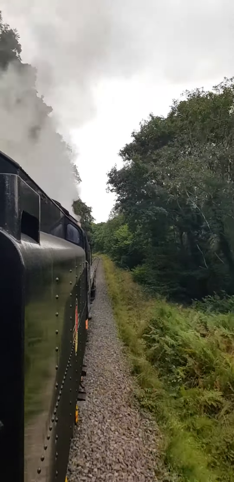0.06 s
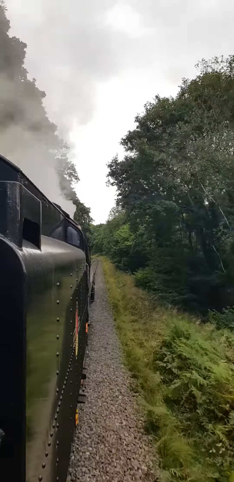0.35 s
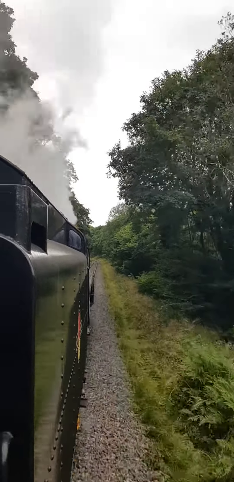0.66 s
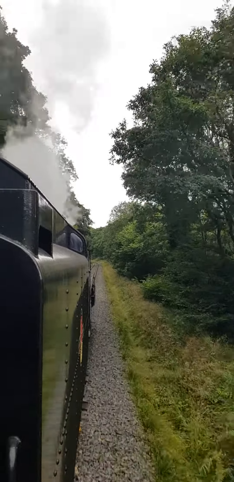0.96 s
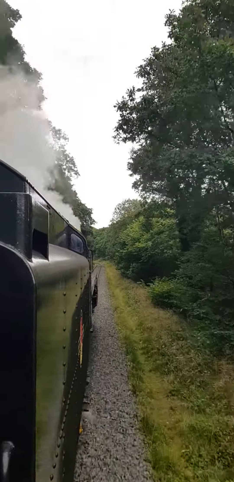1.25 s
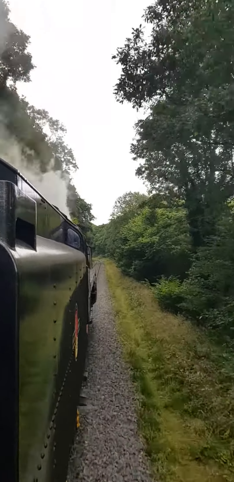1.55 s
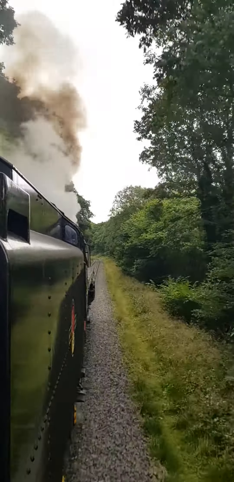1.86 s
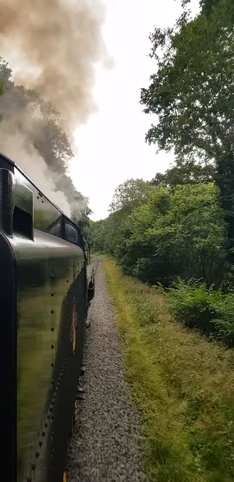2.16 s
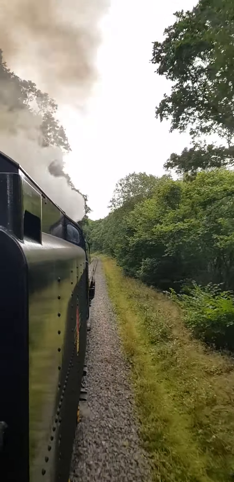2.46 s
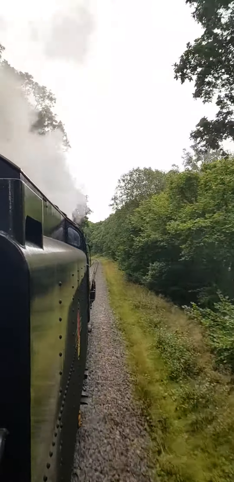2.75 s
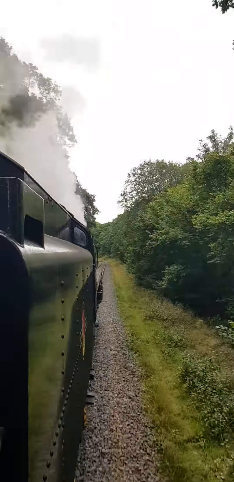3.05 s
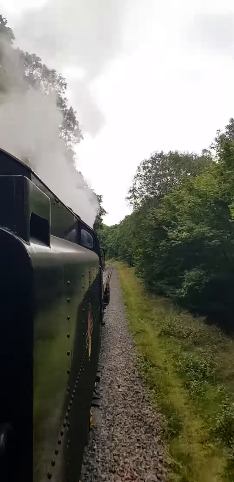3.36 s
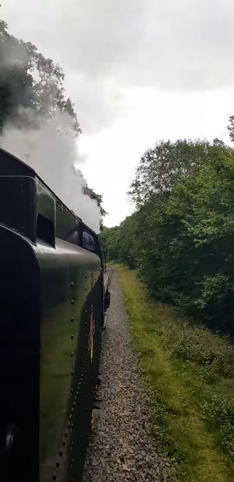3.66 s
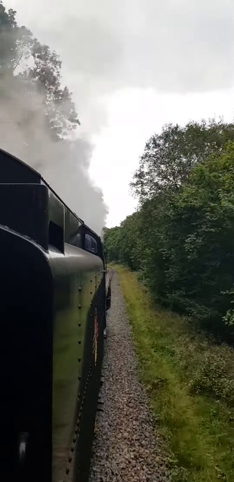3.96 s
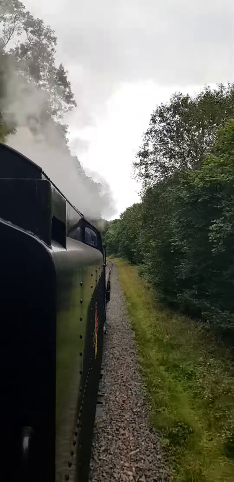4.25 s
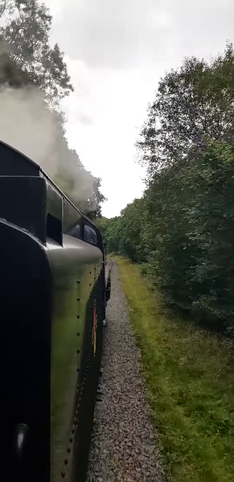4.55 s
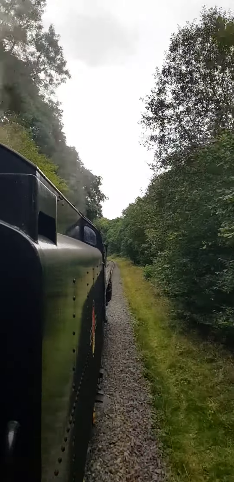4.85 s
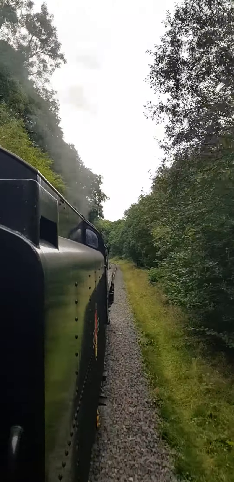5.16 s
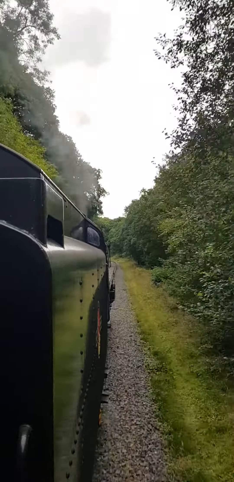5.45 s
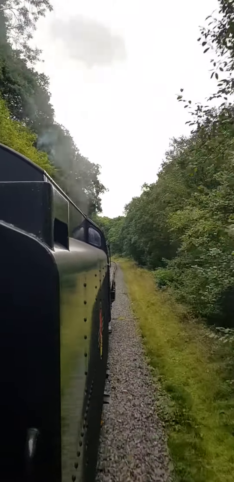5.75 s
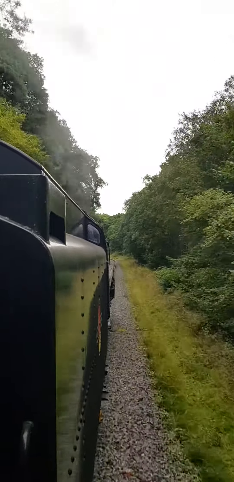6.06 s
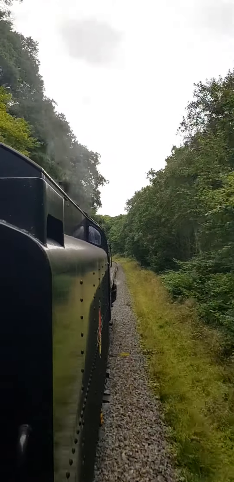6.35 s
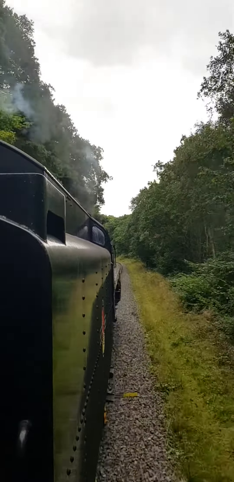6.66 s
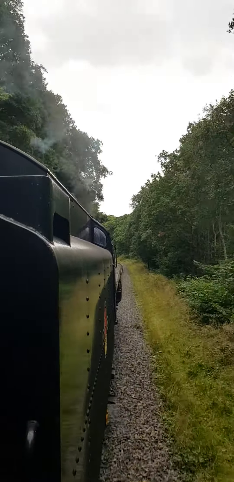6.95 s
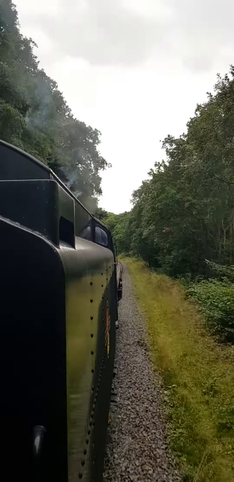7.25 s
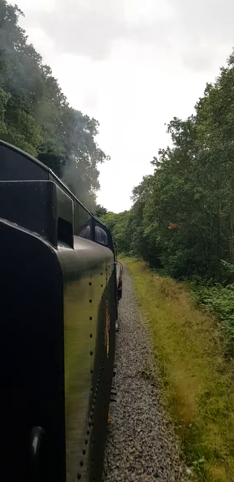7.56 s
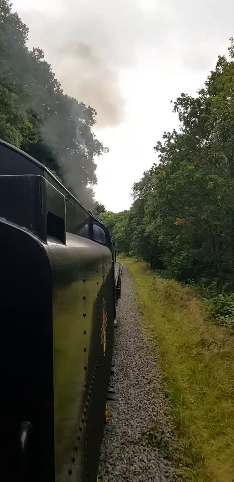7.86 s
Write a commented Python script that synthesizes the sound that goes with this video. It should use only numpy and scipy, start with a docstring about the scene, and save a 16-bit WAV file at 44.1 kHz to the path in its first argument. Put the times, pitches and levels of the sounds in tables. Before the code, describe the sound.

Wind thumps against a microphone held outside a moving train as the steam locomotive ahead sounds two shorter whistles and one long one. The high, breathy note wavers and echoes through the surrounding woods, ending in a brief hiss. Fast, even exhaust beats then take over, swelling into a loud, barking chuff near the end, while a low wheel rumble continues throughout.

```python
"""A steam locomotive whistles three times on a wooded climb, heard leaning out of a carriage.
The whistle is a fluttering note plus jet hiss ringing its bell; trees ahead and behind return
the note Doppler-shifted up and down. Then the exhaust beats, eleven a second, grow loud in the
chimney. Underneath, wheels roll and wind buffets the microphone."""
import sys
import numpy as np
from scipy import signal
from scipy.fft import rfft, irfft, next_fast_len
from scipy.io import wavfile
from scipy.ndimage import uniform_filter1d

SR = 44100
rng = np.random.default_rng(int(sys.argv[2]) if len(sys.argv) > 2 else 0)


def pcm_store(signal):
    """Save signal as 16-bit PCM."""
    levels = np.round(np.clip(np.atleast_2d(signal), -1, 1) * 32767)
    wavfile.write(sys.argv[1], SR, levels.astype(np.int16).T)


N = 348831
T = np.arange(N) / SR
HZ = np.fft.rfftfreq(next_fast_len(N + 2000, True), 1 / SR)
PORT_LEAD_S = 6.8e-5  # left microphone port leads


def amp(db):
    """Decibels to gain."""
    return 10 ** (np.asarray(db) / 20)


def unit_rms(x):
    """Scale to rms 1."""
    return x / np.sqrt(np.mean(x ** 2) + 1e-20)


def curve(rows, at=T):
    """Table columns interpolated over time."""
    time_s, *columns = np.transpose(rows)
    return np.squeeze([np.interp(at, time_s, column) for column in columns])


def spectrum(rows):
    """Table interpolated over log frequency."""
    freq_hz, value = np.transpose(rows)
    return np.interp(np.log(HZ + 1), np.log(freq_hz + 1), value)


def filtered(x, gain_db):
    """Apply a gain per frequency bin."""
    return irfft(rfft(x, 2 * (len(HZ) - 1)) * amp(gain_db))[..., :N]


def wander(rate_hz):
    """Low-passed random drift, rms 1."""
    return unit_rms(filtered(rng.standard_normal(N), -10 * np.log10(1 + (HZ / rate_hz) ** 4)))


# left-right likeness: freq_hz, coherence
PORT_COHERENCE = [(40, 0), (120, 0.21), (300, 0.39), (700, 0.41), (2000, 0.15), (5000, 0.074)]

def noise(shape):
    """Partly coherent stereo noise; the channel mean has rms 1."""
    left, other = rng.standard_normal((2, len(HZ))) + 1j * rng.standard_normal((2, len(HZ)))
    coherence = np.clip(spectrum(PORT_COHERENCE), -1, 1)
    right = coherence * left * np.exp(-2j * np.pi * HZ * PORT_LEAD_S)
    right += np.sqrt(1 - coherence ** 2) * other
    x = irfft(np.array([left, right]) * amp(spectrum(shape)))[:, :N]
    return x / np.std(x.mean(0))


# rolling noise: freq_hz, density_db
ROLL_SPECTRUM = [(30, -24), (100, 1), (220, 4), (330, 4.5), (500, -4), (720, -28), (1200, -31), (2500, -21),
                 (6000, -25.5), (16000, -46)]

def wheels():
    """Wheels roll on the rails, swelling slightly."""
    return noise(ROLL_SPECTRUM) * amp(-42 + 1.2 * wander(rate_hz=3))


# wind strength: time_s, level_db
WIND_LEVEL = [(0, -24), (.3, -27), (.9, -22.5), (1.5, -25.5), (2.05, -22.5), (2.7, -27), (3.3, -27.5),
              (4.12, -22.5), (4.23, -32.5), (4.7, -36.5), (5.2, -33.5), (5.65, -38), (6, -36), (6.3, -36),
              (6.7, -31.5), (7.05, -38.5), (7.9, -30)]
# wind rumble: freq_hz, density_db
RUMBLE_SPECTRUM = [(15, -32), (30, -24), (45, -4.5), (65, 1), (110, -1), (200, -3), (330, -9.5), (550, -13),
                   (900, -18.5), (1400, -22), (2200, -34.5), (6000, -36), (16000, -77)]
# sharp buffets, relative levels: peak_s, rumble_db, flap_db, width_s
WIND_BUFFETS = [(.005, -14, -30, 0.0087), (0.064, -31, -26, 0.011), (0.188, -15.5, -33, 0.085),
                (0.314, -11.5, -35, 0.025), (0.513, -15.5, -35, 0.042), (0.635, -19, -52, 0.012),
                (0.935, -19, -34, 0.027), (1.008, -33, -23.5, 0.0059), (2.196, -20, -36, .012),
                (2.278, -12.5, -41, 0.027), (2.764, -19, -34, 0.032), (3.202, -21, -28, 0.0086),
                (3.355, -15, -41, 0.037), (3.517, -13.5, -48, 0.025), (3.613, -16, -28, 0.022),
                (4.089, -19, -30, 0.039), (4.173, -16.5, -36, 0.03), (4.288, -21, -44, .012),
                (4.965, -24, -51, 0.034), (5.533, -21, -43, .008), (6.121, -32, -28.5, 0.0038),
                (6.273, -18, -45, 0.019), (6.454, -12.5, -29, 0.0054), (6.617, -13.5, -32, 0.011)]

def wind(lump_db=2.5):
    """Wind rumbles at each microphone port; short buffets flap into the midrange."""
    lumps = np.array([wander(rate_hz=62), wander(rate_hz=20.5)])
    rumble_gain, flap_gain = amp(curve(WIND_LEVEL) + lump_db * lumps), np.zeros(N)
    for peak_s, rumble_db, flap_db, width_s in WIND_BUFFETS:
        bump = np.exp(-((T - peak_s) / width_s) ** 2)
        rumble_gain = np.hypot(rumble_gain, amp(rumble_db - 6) * bump)
        flap_gain += amp(flap_db + 4) * bump
    # left port is more sheltered
    lee_db = spectrum([(30, 5), (70, 3.5), (150, 1.3), (400, 4.8)]) * np.array([[-.5], [.5]])
    rumble = filtered(noise(RUMBLE_SPECTRUM), lee_db)
    flap = noise([(150, 5), (500, 7.5), (1300, -1), (2200, -7.5), (5000, -30), (12000, -38)])
    return rumble_gain * rumble + flap_gain * flap


# pipe resonances: freq_hz, width_hz, lift_db
CHIMNEY_MODES = [(338, 45, 4.5), (690, 60, 4.5), (850, 60, 5), (1160, 70, 2.5), (1335, 90, 3.5),
                 (2050, 170, 2.5), (2590, 140, 3)]

def chimney(x):
    """The chimney pipe rings after each blast."""
    for freq_hz, width_hz, lift_db in CHIMNEY_MODES:
        x = x + (amp(lift_db) - 1) * signal.lfilter(*signal.iirpeak(freq_hz, freq_hz / width_hz, SR), x)
    return x


def beat_envelope(starts_s, levels_db, snaps, attack_s, hold_s, linger):
    """Each blast snaps open, holds while the cylinder empties and lingers among the trees."""
    t, power = np.arange(SR // 2) / SR, np.zeros(N)
    linger_s, snap_at_s, snap_decay_s = .072, .01, .0092
    rise = 1 - np.exp(-(t / attack_s) ** 2)
    blast = rise * (np.exp(-(t / hold_s) ** 2) + linger * np.exp(-t / linger_s))
    crack = (t > snap_at_s) * np.exp(-abs(t - snap_at_s) / snap_decay_s)
    for start_s, level_db, snap in zip(starts_s, levels_db, snaps):
        span = power[round(start_s * SR):][:len(t)]
        span += amp(level_db) ** 2 * (blast + snap * crack)[:len(span)]
    return np.sqrt(power)


# exhaust along the climb: time_s, force_db, extra_thud_db, hollow_share
EXHAUST_SWELL = [(0, -13, -1, 0.11), (4.5, -15, 2.5, 0.05), (4.95, -14.5, -.5, 0.14), (5.1, -13, 2.5, 0.13),
                 (6, -12, 2.5, 0.15), (6.42, -7.5, 0.5, 0.45), (6.6, -4.5, 5, 0.57), (7, -2.5, 0, 1),
                 (7.45, -1, 1, 0.58), (7.55, 0.5, -15, 0.64), (7.7, -2, -5, 0.2), (7.8, -2.1, -5.5, 0.5),
                 (7.9, -1, -6, 0)]
# four beats of a wheel turn: accent_db
TURN_ACCENTS = [-1.06, 0.24, -1.6, 0.74]
# standout beats: near_s, extra_thud_db, extra_bark_db, extra_hiss_db, snap_ratio
STANDOUT_BEATS = [(4.517, -2, .5, 0, 0.7), (4.61, 2.5, 1, 0, .4), (4.7, -1.5, -.5, -1.5, .8),
                  (5.06, 1, 2, 0, .4), (5.155, -.5, .5, .5, 0.5), (5.246, 2.5, -1, -1, 0.4),
                  (5.337, -1, 0, 0, 0.6), (5.426, 5, -.5, .5, .6), (5.52, 1, 1.5, 0, .4),
                  (5.611, 1, .5, .5, 0.2), (5.792, 2, 3, 2.5, 0.2), (5.88, 0, 2, 2.5, 0.3),
                  (6.067, .5, 3.5, 2, 0.1), (6.15, -1.5, 2.5, 0, .2), (6.34, 0, 3, .5, .2),
                  (6.43, 3.5, 0, 0, .8), (6.522, -.5, 3.5, .5, 0.3), (6.608, 1.5, 2.5, 3, 0.7),
                  (6.704, 1.5, 1, 1.5, 0), (6.794, -.5, 3.5, 2, 0), (6.88, 1, 1, 0, .2),
                  (6.975, 1.5, 2.5, .5, .2), (7.067, 2, -.5, 0, 0.5), (7.158, 2, 3, 2, 0.4),
                  (7.245, 0, 0, 0, 1), (7.339, 1, -2, 1.5, 0.4), (7.43, 1.5, -1, 0, .2),
                  (7.611, -4, -0.5, -0.5, 0.5), (7.884, -12, 5, -3, 0.6)]

def beats(first_s=.00069, gap_s=.0926, quicken_s=2.3e-5, uneven_db=.6):
    """Slowly quickening pulse: start_s, thud_db, bark_db, hiss_db, snap_ratio."""
    k = np.arange(int(N / SR / gap_s) + 2)
    start_s = first_s + k * (gap_s - quicken_s * k / 2)
    force_db, extra_thud_db, _ = curve(EXHAUST_SWELL, start_s)
    force_db += np.resize(TURN_ACCENTS, len(k))
    scatter_db = uneven_db * rng.standard_normal((len(k), 2))
    thud_db = .81 * force_db + extra_thud_db + scatter_db[:, 0]
    bark_db = 1.14 * force_db + scatter_db[:, 1]
    columns = np.array([thud_db, bark_db, force_db, np.zeros(len(k))])
    for near_s, *extra in STANDOUT_BEATS:
        columns[:, np.argmin(abs(start_s - near_s))] += extra
    return start_s, *columns


# four bands of a blast: freq_hz, density_db
THUD_SPECTRUM = [(40, -19), (120, -3), (220, 0.5), (270, 0.5), (335, 0), (450, -6), (560, -6), (750, -15),
                 (1500, -33)]
ROAR_SPECTRUM = [(60, -24), (200, -7), (265, -6), (320, -3), (430, -3.5), (520, -3.5), (620, -6.5),
                 (800, -26), (1500, -39)]
BARK_SPECTRUM = [(300, -29), (520, -12), (690, 3), (800, 1.5), (1050, -2.5), (1400, -4.5), (2000, -13),
                 (2600, -15), (5000, -71)]
HISS_SPECTRUM = [(1200, 0.5), (2200, -0.5), (3200, -0.9), (5500, -1), (7000, -4.5), (10000, -4.5),
                 (13000, -9.5), (16000, -11)]

def exhaust(churn_db=2.0, crackle_db=1.0):
    """Four steam blasts per wheel turn leave the chimney.
    For a stretch the thud becomes a hollow roar, thrown back by nearby trees."""
    start_s, thud_db, bark_db, hiss_db, snap = beats()
    hollow_share = np.clip(curve(EXHAUST_SWELL)[2], 0, 1)
    thud = amp(-19.5) * np.sqrt(1 - hollow_share) * noise(THUD_SPECTRUM)
    thud *= beat_envelope(start_s, thud_db, .5 * snap, attack_s=.02, hold_s=.058, linger=.1)
    roar = amp(-20.5) * np.sqrt(hollow_share) * noise(ROAR_SPECTRUM)
    roar *= beat_envelope(start_s, thud_db, .5 * snap, attack_s=.021, hold_s=.08, linger=.2)
    bark = amp(-23.5) * noise(BARK_SPECTRUM)
    bark *= beat_envelope(start_s + .0012, bark_db, 1.6 * snap, attack_s=.02, hold_s=.07, linger=.17)
    hiss = amp(-23.5) * noise(HISS_SPECTRUM)
    hiss *= beat_envelope(start_s + .0021, hiss_db, .6 * snap, attack_s=.024, hold_s=.074, linger=.15)
    # the plume churns and crackles
    low = (thud + roar) * amp(churn_db * wander(rate_hz=35))
    bark *= amp(churn_db * wander(rate_hz=44))
    hiss *= amp(crackle_db * wander(rate_hz=190))
    return chimney(low + bark + hiss)


# steam wheeze: freq_hz, density_db
WHEEZE_SPECTRUM = [(1000, -8.5), (2500, -4), (4200, -2), (5400, 12), (6500, -5), (9000, 1), (15000, -14)]
# wheeze strength: time_s, level_db
WHEEZE_LEVEL = [(3.85, -90), (3.98, -58), (4.12, -44), (4.195, -40), (4.225, -61), (4.28, -90)]

def steam_wheeze():
    """A last wheeze of steam swells after the whistle, then stops abruptly."""
    return noise(WHEEZE_SPECTRUM) * amp(curve(WHEEZE_LEVEL))


# whistle cord: open_s, shut_s
CORD_PULLS = [(-.2, .676), (.926, 1.093), (1.288, 3.895)]

def valve(rise_s, fall_s, steepness=2.02):
    """Response to the cord, 0-1: attack, hold, release."""
    pulls = []
    for open_s, shut_s in CORD_PULLS:
        attack = 1 - np.exp(-np.maximum(T - open_s, 0) / rise_s)
        release = np.exp(-(np.maximum(T - shut_s, 0) / fall_s) ** steepness)
        pulls.append(attack * release)
    return np.max(pulls, axis=0)


# fully open whistle, bent by steam pressure: time_s, pitch_hz
PITCH_BEND = [(0, 872), (.15, 870), (.5, 873), (1.05, 876), (1.4, 874), (1.5, 866), (1.65, 879),
              (1.78, 866), (2, 880), (2.12, 870), (2.3, 877), (2.55, 875), (2.92, 867), (3.05, 877),
              (3.18, 869), (3.45, 871), (3.6, 875), (3.88, 866)]

def whistle_pitch_hz(sag_share=.079):
    """Pitch scoops up as steam arrives and sags at cutoff."""
    return curve(PITCH_BEND) * (1 - sag_share * (1 - valve(rise_s=.026, fall_s=.09)))


# steam jet: freq_hz, density_db
JET_SPECTRUM = [(300, -32), (1300, -11.5), (2200, -7), (3050, -10), (4200, -2), (5500, 1.5), (7000, -1.5),
                (9000, 1.5), (12000, -1.5), (16000, -2)]
# bell resonances: harmonic, width_hz, relative_db
BELL_MODES = [(2, 100, -15), (3, 80, -9.7), (4, 230, -6.2), (5, 130, -11), (6, 160, -5.8), (7, 200, -9.5),
              (8, 300, -13)]
# whistle swell, relative levels: time_s, note_db, hiss_db
WHISTLE_SWELL = [(0, -18.5, -35.5), (.55, -19.5, -33.5), (1.05, -18, -28), (1.6, -19, -27.5),
                 (2.3, -19.5, -27), (2.7, -21, -28), (3.1, -18.5, -28.5), (3.6, -15.5, -29.5),
                 (3.9, -21.5, -29.5)]

def steam_jet(flicker_db=1.0):
    """The jet hisses across the whistle lip and rings the bell at multiples of the pitch."""
    phasor = np.exp(2j * np.pi * np.cumsum(whistle_pitch_hz()) / SR)
    eddies = rng.standard_normal((2, N)) + 1j * rng.standard_normal((2, N))
    bell = np.zeros((2, N))
    for harmonic, width_hz, relative_db in BELL_MODES:
        pole, carrier = np.exp(-np.pi * width_hz / SR), phasor ** round(harmonic)
        mode = signal.lfilter([1], np.poly([pole, pole]), eddies / carrier) * carrier
        bell += amp(relative_db) * unit_rms(mode.real)
    bell *= valve(rise_s=.07, fall_s=.11)
    jet = amp(3) * noise(JET_SPECTRUM) * valve(rise_s=.074, fall_s=.11, steepness=1.3)
    return (jet + bell) * amp(curve(WHISTLE_SWELL)[1] + flicker_db * wander(rate_hz=9.7))


def tree_echoes(x, ahead_db, speed_m_s=11.8, sway_m=.015, count=40):
    """Passing trees return x late, Doppler-shifted and blurred by swaying leaves; total rms matches x."""
    behind_m, span_m, nearest_m, depth_m = 20, 56, 6, 10
    t, steps_s = T[T < 4.6], np.arange(0, 4.7, .025)
    echoes = np.zeros((2, N))
    for k, (aside, pan_turns) in enumerate(rng.random((count, 2))):
        place = (k / count - speed_m_s * steps_s / span_m) % 1
        ahead_m = place * span_m - behind_m
        glint, sway = rng.standard_normal((2, len(steps_s)))
        range_m = np.hypot(ahead_m, nearest_m + depth_m * aside) + sway_m * sway
        edge_fade = np.clip(8 * np.minimum(place, 1 - place) - .1, 0, 1)
        level_db = ahead_db * ahead_m / range_m - 30 * np.log10(range_m)
        gain = edge_fade * uniform_filter1d(glint, size=2) * amp(level_db)
        delay_s = np.interp(t, steps_s, 2 * range_m / 343)
        # abs: the whistle is already blowing before time zero
        echo = np.interp(abs(t - delay_s), T, x) * np.interp(t, steps_s, gain)
        pan_rad = 2 * np.pi * pan_turns
        echoes[:, :len(t)] += np.outer([np.cos(pan_rad), np.sin(pan_rad)], echo)
    return unit_rms(echoes) * np.std(x)


# whistle partials, relative levels: harmonic, direct_db, outward_db
WHISTLE_PARTIALS = [(1, 2.9, -2.7), (2, -22, -15.7), (3, -17.5, -18), (4, -22, -15.7), (5, -18.5, -16.3),
                    (6, -11.5, -18.5), (7, -35, -25)]
# direct overtone slope: time_s, tilt_db_per_decade
OVERTONE_TILT = [(0, -3), (1, -18), (1.4, -9), (2.3, -35), (3, -2), (3.55, -5), (4, -6)]
# echo strength as the wood closes in and opens: time_s, note_db, overtones_db
ECHO_LEVEL = [(0, -.5, 2.5), (.65, -.5, 2.5), (1.2, 1.5, 1.5), (1.6, 3, 1), (2.4, 4, 4), (3.3, .5, -.5),
              (3.6, .5, -1.5), (3.9, 3.5, 1.5), (4.3, -4, -8)]

def whistle(flutter_db=1.3, jitter_share=.0022):
    """Steam blows a fluttering note with weak overtones, heard directly and off the trees."""
    pitch_hz = whistle_pitch_hz() * (1 + jitter_share * wander(rate_hz=28))
    cycles = np.cumsum(pitch_hz) / SR
    port_cycles = np.array([cycles, cycles - pitch_hz * PORT_LEAD_S])
    level_db = curve(WHISTLE_SWELL)[0] + flutter_db * wander(rate_hz=16.6)
    envelope = valve(rise_s=.0075, fall_s=.084) * amp(level_db)
    direct, outward = np.zeros((2, N)), []
    for harmonic, direct_db, outward_db in WHISTLE_PARTIALS:
        partial = envelope * np.sin(2 * np.pi * harmonic * port_cycles)
        direct += amp(direct_db + curve(OVERTONE_TILT) * np.log10(harmonic)) * partial
        outward.append(amp(outward_db) * partial[0])
    note_gain, overtone_gain = amp(curve(ECHO_LEVEL))
    echoes = note_gain * tree_echoes(outward[0], ahead_db=-.5)
    echoes += overtone_gain * tree_echoes(sum(outward[1:]), ahead_db=9)
    # engine left, trees right
    return direct * amp([[1.3], [-.9]]) + echoes * amp([[-1.4], [1.2]])


# whistle and jet balance: freq_hz, left_minus_right_db
WHISTLE_BALANCE = [(870, -0.5), (3500, 1), (4400, -4.5), (5300, -9), (6200, -4), (7200, 0.5), (9000, 2.5),
                   (15000, 2.5)]

def scene():
    """Whistle and jet come round the side of the boiler; the rest surrounds the listener."""
    side_db = spectrum(WHISTLE_BALANCE) * np.array([[.5], [-.5]])
    return filtered(whistle() + steam_jet(), side_db) + steam_wheeze() + exhaust() + wind() + wheels()


# microphone ports: freq_hz, gain_db
PORT_RESPONSE = [(20, -2), (6000, -1), (7200, -1.5), (8300, -8), (9300, -5), (10500, 1), (13000, 2.7),
                 (14500, -1.5), (15500, -5.5)]

def record(dry):
    """Microphone port colour, then the band limit."""
    cutoff_hz = 15780
    lowpass = signal.firwin(701, cutoff_hz, window=("kaiser", 9), fs=SR)
    return signal.oaconvolve(filtered(dry, spectrum(PORT_RESPONSE)), lowpass[None], "same", axes=1)


dry = scene()
out = record(dry)
pcm_store(out)
```